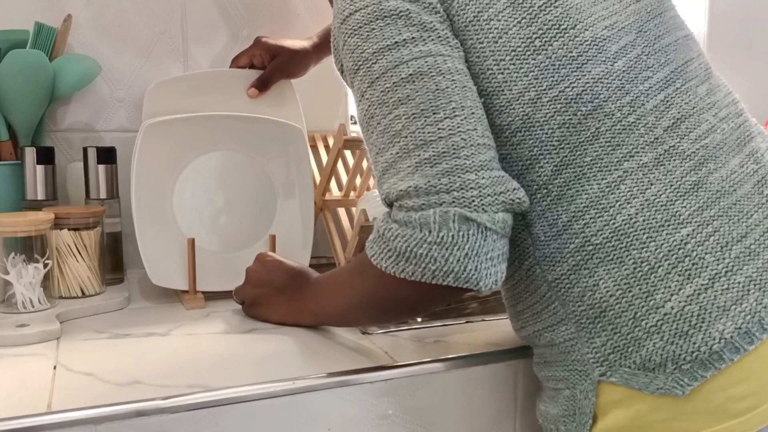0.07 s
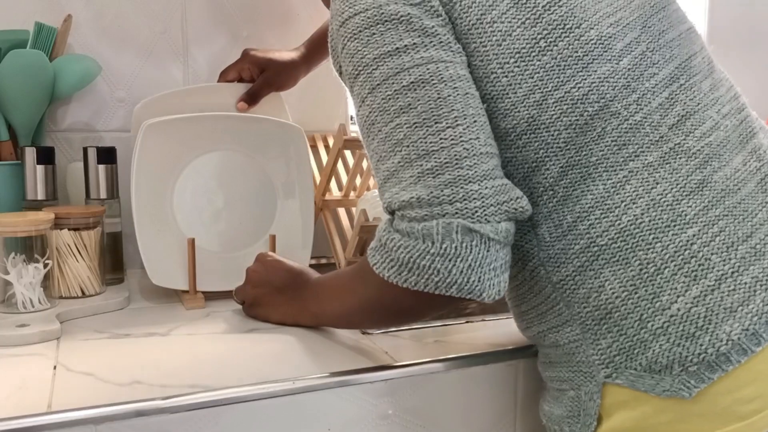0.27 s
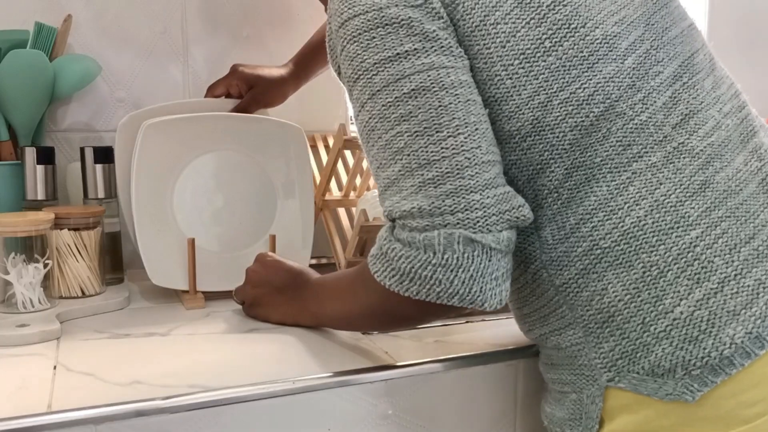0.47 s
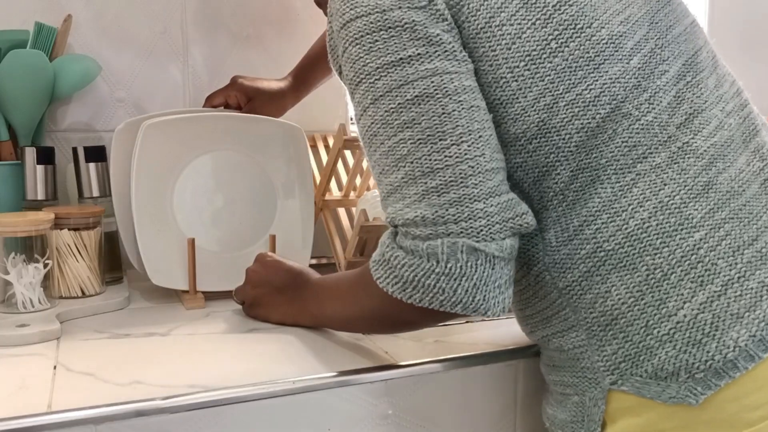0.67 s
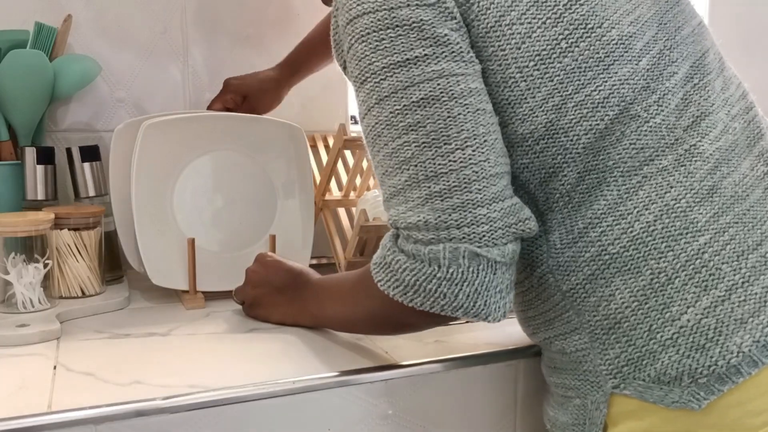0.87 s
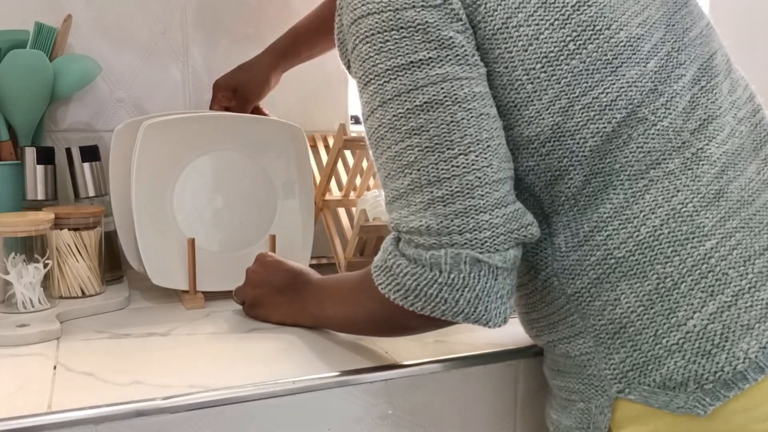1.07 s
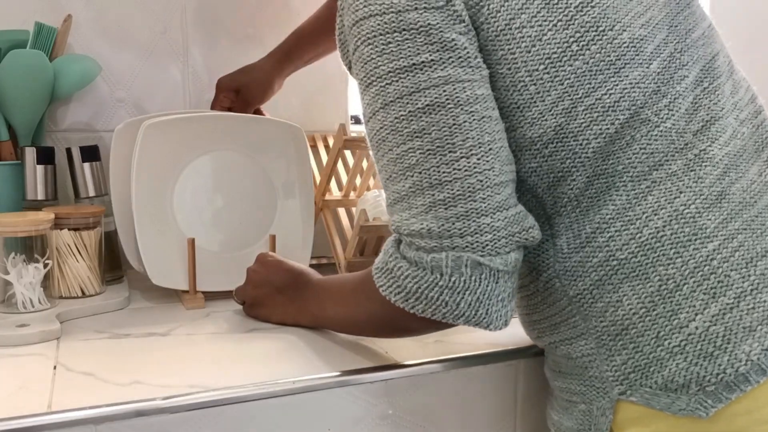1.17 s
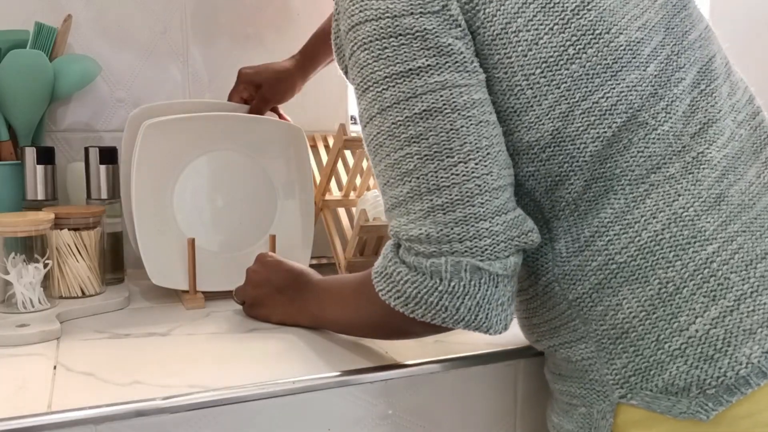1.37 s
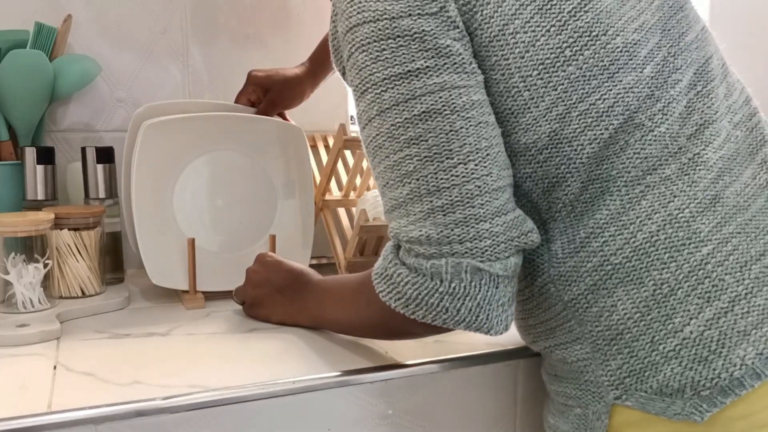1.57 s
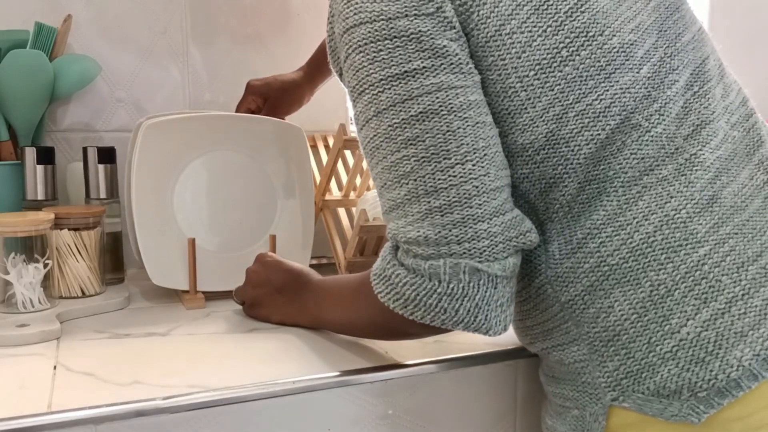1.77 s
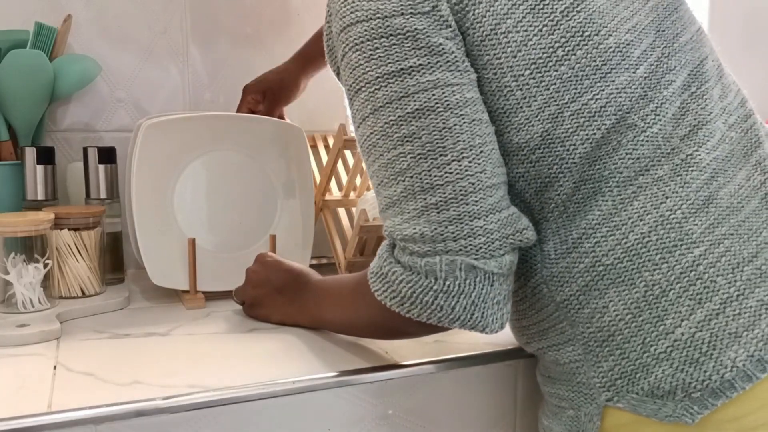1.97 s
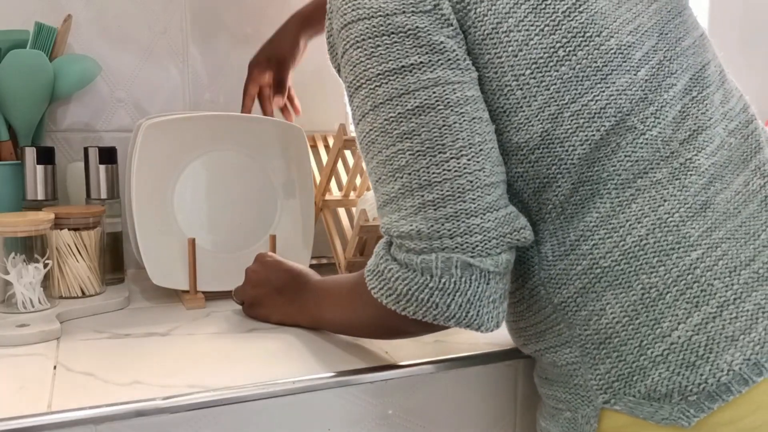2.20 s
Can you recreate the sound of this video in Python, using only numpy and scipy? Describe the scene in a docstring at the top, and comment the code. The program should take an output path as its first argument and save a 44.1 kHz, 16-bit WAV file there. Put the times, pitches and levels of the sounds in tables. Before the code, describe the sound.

Ceramic plates clink, scrape and clatter as they are set upright in a wooden stand.

```python
"""Racking plates in a kitchen

Ceramic plates are set upright in a wooden stand on the counter, a metre or so from a stereo pair.
A plate rubs and clinks against its neighbours, knocks on the stand, scrapes along, then drops home
with a clatter. Each contact is a short crack plus the ringing of plates and stand; the hard room
prolongs it over a faint rumble."""
import sys
import numpy as np
from scipy import signal
from scipy.fft import rfft, irfft, next_fast_len
from scipy.io import wavfile

SR = 44100
rng = np.random.default_rng(int(sys.argv[2]) if len(sys.argv) > 2 else 0)


def master_out(mix):
    """Clip the mix to full scale and print it as 16-bit PCM to the path in sys.argv[1]."""
    frames = np.transpose(np.atleast_2d(mix))
    ceiling = np.clip(frames, -1, 1)
    pcm = np.round(ceiling * 32767).astype(np.int16)
    wavfile.write(sys.argv[1], SR, pcm)


N = 98607
SIZE = 49152  # samples in one event and its decay
T = np.arange(SIZE) / SR
HZ = np.maximum(np.fft.rfftfreq(SIZE, 1 / SR), 1)

# the kitchen at the microphones, by band: f/Hz, t60/s, side over mid/dB, left over right/dB
ROOM_BANDS = [(122, 0.58, -31.5, 3), (280, 0.35, -13, -1), (600, 0.74, -7.5, -2), (1126, 0.48, 3.5, 0),
              (2900, 0.6, -0.5, -2.5), (5200, 0.48, 0.5, -0.5), (7300, 0.46, -0.5, -7), (11000, 0.27, 1, 1)]
# the six bands that shape a crack: f/Hz
CRACK_BANDS = [400, 1000, 2000, 3500, 7000, 12000]


def undb(db):
    """Decibels to gain."""
    return 10 ** (np.asarray(db) / 20)


def along(points, hz, axis=1):
    """Reads a column of a table on a log-frequency axis."""
    table = np.array(points, float)
    return np.interp(np.log(hz), np.log(table[:, 0]), table[:, axis])


def unit(x):
    """Scales each channel to energy 1."""
    return x / np.sqrt(np.sum(x ** 2, axis=-1, keepdims=True) + 1e-18)


def fade(t60):
    """Exponential decay by 60 dB in t60 seconds."""
    return np.exp(-np.log(1000) * T / t60)


def colour(x, points):
    """Filters x by a spectrum, to rms 1."""
    n = x.shape[-1]
    size = next_fast_len(n)
    hz = np.maximum(np.fft.rfftfreq(size, 1 / SR), 1)
    filtered = irfft(rfft(x, size) * undb(along(points, hz)), size)
    return unit(filtered[..., :n]) * np.sqrt(n)


def click(db):
    """The shortest causal pulse with the given spectrum."""
    cepstrum = irfft(db * np.log(10) / 20)
    cepstrum[1:SIZE // 2] *= 2
    cepstrum[SIZE // 2 + 1:] = 0
    return irfft(np.exp(rfft(cepstrum)))


def add(out, x, s):
    """Mixes x into out from time s."""
    start = int(s * SR)
    n = min(x.shape[-1], N - start)
    out[..., start:start + n] += x[..., :n]


def through(x, room):
    """Plays a short sound into the room."""
    return irfft(rfft(x, 2 * SIZE) * room)[:, :SIZE]


def room_tone(floor_db=-73.5, side_db=-9.5):
    """Faint room noise and a low rumble that swells while the plates are moved."""
    # spectrum of the steady noise: f/Hz, relative level/dB
    floor_spectrum = [(25, -15), (54, -8), (80, -12), (190, -27), (400, -15.5), (750, -26.5), (1500, -36),
                      (3000, -34.5), (8000, -48), (15000, -96)]
    # spectrum of the rumble: f/Hz, relative level/dB
    rumble_spectrum = [(20, -20), (52, 0), (100, -7), (170, -5), (400, -12), (1000, -37)]
    # swell of the rumble: t/s, level/dB
    rumble_swell = [(0, -74.5), (.6, -65), (.95, -61), (1.2, -63), (1.45, -63), (1.649, -59.5), (2.24, -66)]
    floor_mid, floor_side = colour(rng.standard_normal((2, N)), floor_spectrum) * undb(floor_db)
    times, db = np.array(rumble_swell).T
    swell = undb(np.interp(np.arange(N) / SR, times, db))
    rumble_mid, rumble_side = colour(rng.standard_normal((2, N)), rumble_spectrum) * swell
    mid = floor_mid + rumble_mid
    side = undb(side_db) * (floor_side + rumble_side)
    return np.array([mid + side, mid - side])


def rub():
    """Glaze slides softly over glaze as the plate is lowered behind the others."""
    # swell of the rub: t/s, level/dB
    rub_swell = [(.17, -110), (.28, -73), (0.359, -66), (.44, -72), (0.504, -70)]
    # friction noise as the plates colour it: f/Hz, relative level/dB
    rub_spectrum = [(200, -22), (370, 8.5), (700, 1.5), (1020, -1.5), (1300, 1.5), (1600, -2), (2000, 4.5),
                    (2600, -3.5), (3050, -5), (5000, -10.5), (9000, -21), (15000, -14)]
    times, db = np.array(rub_swell).T
    swell = np.interp(np.arange(N) / SR, times, undb(db), left=0, right=0)
    return colour(rng.standard_normal((2, N)), rub_spectrum) * swell


def kitchen(direct_db=-13, left_lag_s=0.00018, build_s=0.001, early_db=-5, early_s=0.0055):
    """Frequency response from one spot to the pair: weak direct sound, close reflections, a tail."""
    noise = rfft(rng.standard_normal((2, SIZE)))
    centres = np.log([row[0] for row in ROOM_BANDS])
    early = 1 + undb(early_db) * np.exp(-T / early_s)  # counter and tiles close by
    onset = (1 - np.exp(-T / build_s)) * early
    out = np.zeros((2, SIZE))
    for band, (_, t60, side_db, pan_db) in zip(np.eye(len(ROOM_BANDS)), ROOM_BANDS):
        mid, side = irfft(noise * np.interp(np.log(HZ), centres, band))
        width = undb(side_db)
        pair = np.array([mid + width * side, mid - width * side]) / np.hypot(1, width)
        out += pair * unit(onset * fade(t60)) * undb([[pan_db / 2], [-pan_db / 2]])
    out[0, int(left_lag_s * SR)] += undb(direct_db)
    out[1, 0] += undb(direct_db)
    return rfft(out, 2 * SIZE)


def crack(levels, bass_hz=268, crunch_hz=1460, crunch_s=0.0043):
    """Ceramic meets ceramic: one clean push in the bass, a crunch of tiny touches in the treble."""
    db = along(list(zip(CRACK_BANDS, levels)), HZ)
    octaves_below = np.maximum(np.log2(bass_hz / HZ), 0)
    octaves_above = np.maximum(np.log2(HZ / CRACK_BANDS[-1]), 0)
    db = db - 22.5 * octaves_below - 8 * octaves_above
    crunch_share = 0.53 / (1 + (crunch_hz / HZ) ** 2)
    push = click(db + 10 * np.log10(1 - crunch_share))
    touch = click(db + 10 * np.log10(crunch_share))
    scatter = unit(rng.standard_normal(SIZE) * np.exp(-T / crunch_s))
    return push + irfft(rfft(touch) * rfft(scatter))


def struck(hz, t60, attack_s=0.00065):
    """One mode: it swells during the contact, then dies away."""
    return np.sin(2 * np.pi * hz * T) * (1 - np.exp(-T / attack_s)) * fade(t60)


def body_rings(modes, room, grip=0.73, direct_db=-9.5):
    """The stereo ring of each mode of a plate or the stand, heard directly and through the room."""
    rings = []
    for hz, db, t60 in modes:
        ring = struck(hz, t60 * grip)  # hand and stand shorten every ring
        mid, side = unit(through(ring, room))
        mid = unit(mid + undb(direct_db) * unit(ring))
        side = unit(side - np.dot(side, mid) * mid)  # keep only what is unlike the mid
        side *= undb(along(ROOM_BANDS, hz, axis=2))
        pan_db = along(ROOM_BANDS, hz, axis=3)
        pair = unit(np.array([mid + side, mid - side]))
        rings.append(pair * undb([[db + pan_db / 2], [db - pan_db / 2]]))
    return np.array(rings)


def clinks(rooms, tilt_hz=3000, spread_db=0.88, radiate_hz=232):
    """Each contact cracks and sets four plates and the stand ringing; they radiate little bass."""
    # contacts: t/s, crack level/dB in each of CRACK_BANDS, ring gain/dB of each of the five bodies,
    # ring tilt/(dB per octave) above tilt_hz
    contacts = [ (.5140, 6, 7.5, -17, 1, 8, -8, 0.5, -38, -44, -36, -17, 0.5),
                (.5330, -2.5, 1.5, 1.5, 8, -14, -33, -7, -32, -40, -38, -11, -3),
                (.6080, -5, -7, 1.5, 0, -28, -39, -7, -1.5, -20, -22, -14, -5.5),
                (.6640, 3, 2, 8.5, 5, -10, -23, -16, -8, -12.5, -6.5, -8.5, -1),
                (.8590, 7.5, 9, -6.5, 5.5, -4.5, -20.5, -14, -9.5, -16, 2, 2, 1),
                (0.9499, -8, -2.5, 5.5, 2, -5.5, -17, -25, -3.5, -24, -5.5, -9.5, 2.5),
                (1.3187, 1, 3, 0.5, 1.5, -7.5, -26, -12.5, 1, -17.5, -6.5, -10.5, -0.5),
                (1.6967, -8, -7, -4, -7, -8.5, -22.5, -12, -12, -16.5, -5, 5.5, -6.5),
                (1.7770, 9.5, 6, 10.5, 16.5, 9.5, -10, -21, 4, 3.5, -0.5, 3, -1.5),
                (1.7890, 12, 1, 16, 9.5, -4, -17, -28, -25, -4.5, 1, -2, -4),
                (1.7965, 7, 5, 6, 16.5, 1.5, -26, -22, -16, -5, -22, -9.5, -5),
                (1.8060, -12, -1, 3, 4, -16, -24, -14.5, -23, -7.5, -5, -14, -2.5),
                (1.8310, 7, 0, -6.5, -3, -14, -23, -7.5, -10, -7, -7, -9.5, -15)]
    # modes of the rear, middle, front and hand-held plates and the wooden stand:
    # f/Hz, relative level/dB, t60/s before the grip shortens it
    rear_modes = [(277.5, -14.5, 0.33), (461.8, -13.5, 0.45), (908.5, -9.5, 0.13), (1189, -17.5, 0.27),
                  (1393, -15, 0.068), (2496, -5.5, 0.71), (2700, -3.5, 0.16), (2853, -9, 0.23),
                  (3027, -2, 0.62), (3055, 2, 0.12), (3719, -1, 0.056), (4640, -12, 0.12), (5330, -4, 0.15),
                  (6410, -19, .12), (6520, -20, 0.082), (6900, -14.5, 0.34), (7497, -8.5, 0.098),
                  (7743, -23, 0.094), (8080, -10, 0.11), (8460, -10, 0.32), (9255, -23, 0.41),
                  (10080, -19, 0.4), (10300, -20.5, 0.31), (11260, -16, 0.22), (11500, -17, .1),
                  (12684, -17, 0.34), (14912, -26, 0.22)]
    middle_modes = [(898, -14.5, .15), (1735, -12.5, 0.33), (2550, -11, 0.12), (3035, -13.5, 0.28),
                    (3090, -12, 0.32), (3900, -17, .2), (4433, -15.5, 0.1), (4680, -17, 0.13),
                    (5400, -11.5, 0.29), (5446, -10.5, 0.3), (6500, -33, .2), (7430, -18, .2),
                    (8350, -20.5, 0.22), (9140, -43, .26), (9942, -24, .3), (11700, -22.5, 0.16),
                    (12875, -39, .3), (13523, -31, 0.16)]
    front_modes = [(453, -11.5, 0.072), (1915, -11, .25), (2080, -3, 0.22), (1988, -5, 0.16),
                   (2366.5, -0.5, 0.25), (2462, 0.5, .22), (3082, -2, .35), (3910, -10.5, 0.17),
                   (4160, -15, 0.071), (4826, -9, 0.18), (5442, -10, 0.069), (6105, -21, 0.39),
                   (6420, -8, 0.048), (6660, -20, 0.083), (9130, -48, 0.17), (11130, -16, .1),
                   (13702, -22, 0.149)]
    held_modes = [(782, -12, 0.13), (952.7, -8.5, 0.22), (1968, -5.5, 0.085), (3840, -15, 0.17),
                  (4525, -13, 0.28)]
    stand_modes = [(411.7, -18, 0.23), (442.5, -13, 0.12), (663, -20.5, 0.17), (882, -16, 0.092),
                   (969, -10, 0.14)]
    bodies = []
    for modes, room in zip((rear_modes, middle_modes, front_modes, held_modes, stand_modes), rooms):
        octaves_above = np.maximum(np.log2(np.array(modes)[:, 0] / tilt_hz), 0)
        bodies.append((body_rings(modes, room), octaves_above))
    out = np.zeros((2, N))
    for k, (s, *levels, tilt_db) in enumerate(contacts):
        crack_levels, ring_gains = levels[:len(CRACK_BANDS)], levels[len(CRACK_BANDS):]
        add(out, through(crack(crack_levels), rooms[k % len(rooms)]), s)
        for (rings, octaves_above), db in zip(bodies, ring_gains):
            # where a plate is touched changes the strength of each mode
            touch_db = spread_db * rng.standard_normal(len(rings))
            strength = undb(db + tilt_db * octaves_above + touch_db)
            add(out, np.tensordot(strength, rings, 1), s)
    return signal.sosfilt(signal.butter(5, radiate_hz, "high", fs=SR, output="sos"), out)


def scrapes(room, grains_per_s=2500, spread_db=8.5, attack_s=0.0025):
    """A rim slides over its neighbour in short pushes of dense, uneven grains."""
    # pushes of rim on rim: t/s, length/s, level/dB
    pushes = [(0.663, .05, -45.5), (1.014, 0.058, -38), (1.115, 0.031, -39), (1.159, 0.037, -37.5)]
    # spectrum of the scraping rim: f/Hz, relative level/dB
    scrape_spectrum = [(200, 8), (1200, 3.5), (2400, 16.5), (2510, 26), (2620, 14), (3500, 13),
                       (5000, 18.5), (7000, 12), (9500, 3.5), (11500, 14), (13500, 3), (16000, -16)]
    out = np.zeros((2, N))
    for s, length, db in pushes:
        catches = rng.random(SIZE) < grains_per_s / SR
        grains = catches * rng.standard_normal(SIZE) * undb(spread_db * rng.standard_normal(SIZE))
        push = np.minimum(T / attack_s, 1) * np.sqrt(np.maximum(1 - T / length, 0))
        add(out, through(colour(grains, scrape_spectrum) * push * undb(db), room), s)
    return out


def knocks(room, overtone_ratio=2.4, overtone_db=1.5, echo_db=5.5):
    """The wooden stand rocks on the counter: a dull thump with a shorter overtone."""
    # thumps of the stand: t/s, f/Hz, t60/s, level/dB
    thumps = [(.783, 545, 0.019, -37.5), (.882, 409, 0.073, -42.5), (1.4518, 540, .014, -31),
              (1.4738, 421, 0.029, -38), (1.6975, 425.5, 0.098, -34.5), (1.79, 156, 0.063, -45.5),
              (1.944, 336, 0.054, -47.5)]
    out = np.zeros((2, N))
    for s, hz, t60, db in thumps:
        overtone = struck(hz * overtone_ratio, t60 / overtone_ratio)
        thump = struck(hz, t60) + undb(overtone_db) * overtone
        add(out, (thump + undb(echo_db) * through(thump, room)) * undb(db), s)
    return out


def ticks(room, direct_db=-9):
    """A rim flicks its neighbour and rings for a moment in one bright band."""
    # light flicks of rim on rim: t/s, centre f/Hz, width/Hz, level/dB
    flicks = [(1.5221, 5214, 390, -18.5), (1.6980, 5410, 200, -14), (1.7807, 5000, 3930, -6.5),
              (1.8012, 5450, 3460, -11), (1.9376, 4780, 650, -7)]
    out = np.zeros((2, N))
    for s, hz, width, db in flicks:
        band_db = -20 * np.log10(1 + (2 * (HZ - hz) / width) ** 2)
        pulse = unit(click(band_db))
        add(out, (through(pulse, room) + undb(direct_db) * pulse) * undb(db), s)
    return out


def scene():
    """The plates and stand as the pair hears them, from five spots that each echo differently."""
    rooms = [kitchen() for _ in range(5)]
    clatter = clinks(rooms) + knocks(rooms[2]) + ticks(rooms[0])
    return clatter + scrapes(rooms[1]) + rub() + room_tone()


def record(dry):
    """The recorder cuts the treble steeply above 15.3 kHz."""
    return signal.sosfilt(signal.ellip(8, .2, 70, 15300, fs=SR, output="sos"), dry)


dry = scene()
out = record(dry)
master_out(out)
```